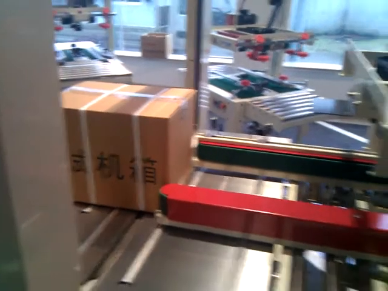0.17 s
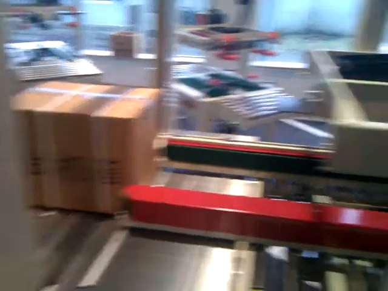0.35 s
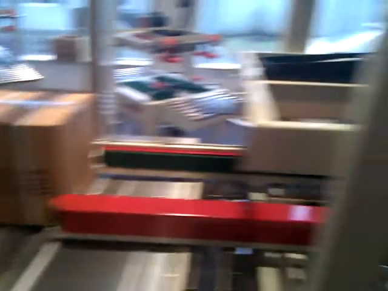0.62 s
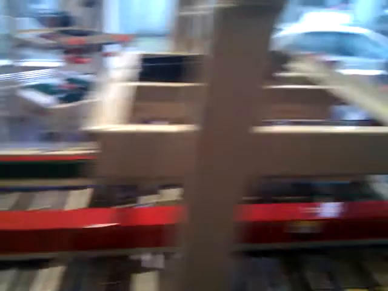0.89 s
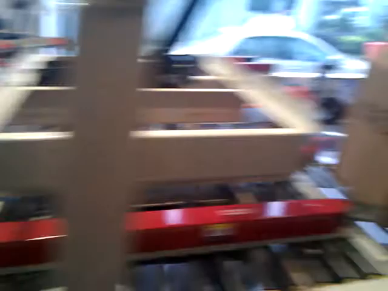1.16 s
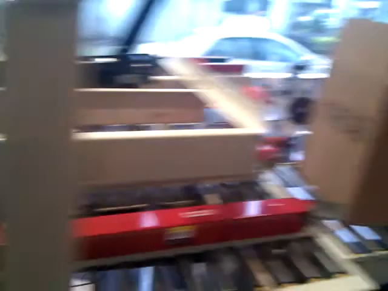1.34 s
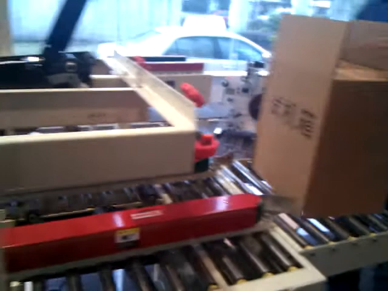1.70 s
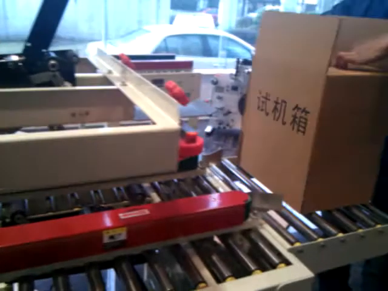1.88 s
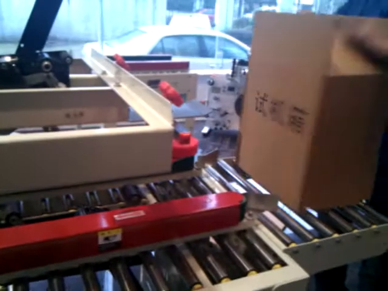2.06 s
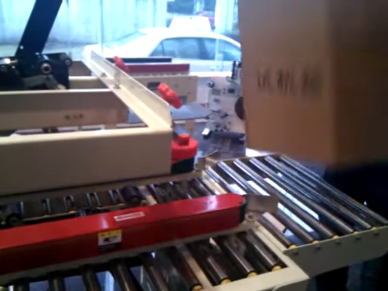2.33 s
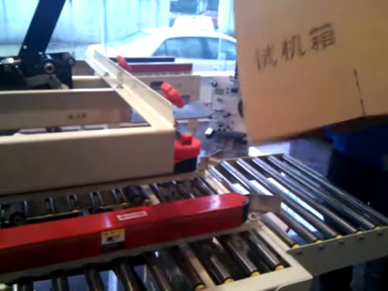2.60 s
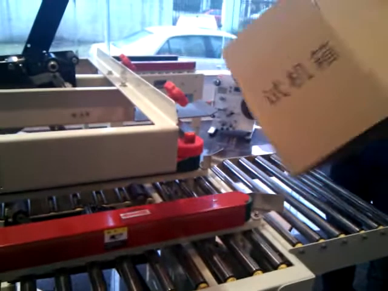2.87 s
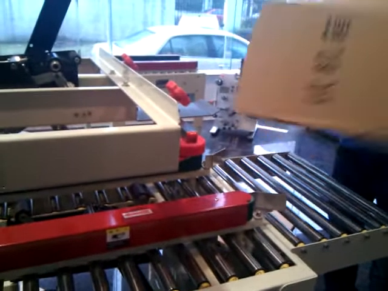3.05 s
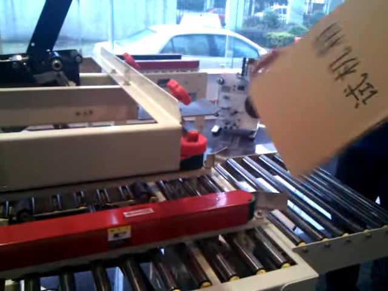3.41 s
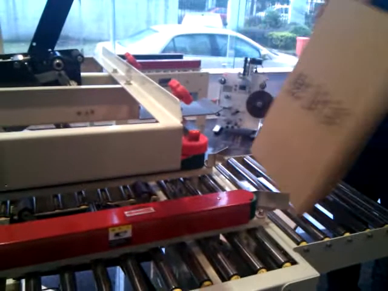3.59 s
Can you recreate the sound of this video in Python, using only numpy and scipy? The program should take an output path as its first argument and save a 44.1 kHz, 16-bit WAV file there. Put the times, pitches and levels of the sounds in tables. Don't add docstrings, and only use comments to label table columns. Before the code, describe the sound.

Conveyor machinery drones with a gear rattle as a cardboard carton is knocked and dragged over rollers

```python
import sys
import numpy as np
from scipy import signal
from scipy.fft import rfft, irfft, next_fast_len
from scipy.io import wavfile
from scipy.ndimage import uniform_filter1d, map_coordinates

SR = 44100
rng = np.random.default_rng(int(sys.argv[2]) if len(sys.argv) > 2 else 0)


def dump_mix(stems):
    frames = np.atleast_2d(stems).T
    limited = np.clip(frames, -1, 1)
    pcm = np.round(limited * 32767).astype(np.int16)
    wavfile.write(sys.argv[1], SR, pcm)


def gain_from_db(level_db):
    decades = np.asarray(level_db, float) / 20
    return 10 ** decades


N = 164493


def unit(x):
    return x / np.sqrt(np.mean(x ** 2) + 1e-20)


def along(points, hz):
    f, v = np.transpose(points)
    return np.interp(np.log(hz + 1), np.log(f + 1), v)


def curve(rows):
    return np.interp(np.arange(N) / SR, *np.transpose(rows))


def wobble(rate):
    knots = rng.standard_normal(int(N / SR * 60) + 4)
    return map_coordinates(knots, [np.arange(N) * min(rate, 60) / SR])


def filtered(x, response):
    m = next_fast_len(N + SR // 2)
    hz = np.fft.rfftfreq(m, 1 / SR)
    return irfft(rfft(x, m) * response(hz), m)[..., :N]


def body(x, peaks):
    def response(f):
        total = 0
        for k, (center, width, db) in enumerate(peaks):
            resonance = 1j * f * width / (center ** 2 - f ** 2 + 1j * f * width)
            total = total + (-1) ** k * gain_from_db(db) * resonance
        return total
    return filtered(x, response)


def grit(per_s, spread_db):
    size = gain_from_db(spread_db * np.clip(rng.standard_normal(N), -2, 2))
    return (rng.random(N) < per_s / SR) * rng.choice([-1, 1], N) * size


def ring(hits, modes, rise_s):
    out, t = np.zeros(N + SR), np.arange(SR // 4) / SR
    for start, db, hz in hits:
        tone = 0
        for share, level, t60 in modes:
            decay = gain_from_db(level + rng.normal(0, 1) - 60 * t / t60)
            tone = tone + decay * np.sin(2 * np.pi * hz * share * t)
        out[round(start * SR):][:len(t)] += gain_from_db(db - 1) * tone * (1 - np.exp(-t / rise_s))
    return out[:N]


# start in seconds, length in seconds, level in dB.
SLIPS = [(0.015, 0.047, -20.5), (0.154, 0.03, -22.5), (0.23, 0.074, -33), (0.428, 0.0047, -21),
         (0.493, 0.019, -29.5), (0.934, 0.079, -31.5), (0.983, 0.0086, -22), (1.17, 0.012, -20.5),
         (1.257, 0.0063, -20.5), (1.29, 0.11, -31.5), (1.736, 0.012, -25.5), (1.821, 0.027, -24),
         (1.93, 0.0097, -21), (2.468, 0.0074, -25.5), (2.532, 0.0039, -23), (2.552, 0.017, -23),
         (2.592, 0.015, -25.5), (2.682, 0.11, -33), (2.989, .02, -28.5), (3.027, 0.028, -27.5),
         (3.255, 0.0092, -20), (3.27, 0.015, -22), (3.539, 0.008, -26), (3.594, 0.008, -22),
         (3.632, 0.0053, -19), (3.646, 0.0074, -25)]
# time in seconds, level in dB.
DRAG = [
    (1.94, -49),
    (1.955, -7.5),
    (2.0, -13.5),
    (2.15, -14.5),
    (2.2, -19),
    (2.27, -13.5),
    (2.29, -11.5),
    (2.31, -23.5),
    (2.36, -42),
]
# resonance in Hz, width in Hz, level in dB.
ROLLER = [(4440, 790, 15.5), (3300, 4000, -4.5), (7450, 1000, -31.5), (1730, 3500, 4.5), (510, 870, 2.5)]


def rollers():
    rise_s, t60_s = 0.006, 0.049
    t, force = np.arange(N) / SR, np.zeros(N)
    for start, length, db in SLIPS:
        u = t - start
        fade_db = 60 * np.clip(u - length, 0, None) / t60_s
        force = force + gain_from_db(db - fade_db) * np.clip(u / rise_s, 0, 1)
    grains = unit(grit(per_s=2800, spread_db=4))
    hiss = rng.standard_normal(N)
    drag = gain_from_db(curve(DRAG) + 0.9 * wobble(40)) * (hiss + 0.48 * grains)
    slips = force * (grains + 0.74 * hiss)
    return body(slips + drag, ROLLER) / np.std(body(grains, ROLLER))


# start in seconds, level in dB, pitch in Hz.
THUMPS = [(.14, -27, 199), (.495, -20, 292), (2.28, -13.5, 168), (2.595, -14.5, 378), (2.929, -20, 360),
          (3.27, -16, 315), (3.561, -16, 380), (3.653, -15, 310), (3.665, -16, 330), (3.688, -17, 370),
          (1.549, -3, 300), (1.561, -9, 268), (1.901, -7, 316), (1.932, -9, 530), (1.942, -8, 371),
          (1.948, -8, 710), (3.545, -7, 300), (3.594, -9, 215)]
# share of the pitch, level in dB, 60 dB decay in seconds.
CARTON = [(.5, -14, .07), (.8, -3, .08), (1, 0, .05), (1.4, -4, .04), (2, -10, .03), (3.5, -14, .025)]
# center in Hz, width in Hz, level in dB.
CARTON_BAND = [(380, 600, 0)]


def carton():
    return body(ring(THUMPS, CARTON, rise_s=0.0025), CARTON_BAND)


def cracks(hits):
    t, t60_s, snap_db = np.arange(N) / SR, 0.005, -15
    force = 0
    for start, db, _ in hits:
        force = force + gain_from_db(db + snap_db - 60 * np.clip(t - start, 0, 1) / t60_s) * (t > start)
    return force * unit(body(rng.standard_normal(N), [(4000, 3500, 0)]))


# start in seconds, level in dB, pitch in Hz.
CLACKS = [(.022, -10, 4370), (.038, -9, 4100), (.06, -9, 4100), (.16, -9, 4030), (.165, -9, 3000),
          (.437, -9, 3900), (.717, -10, 2050), (.724, -10, 2000), (.739, -8, 2000), (.772, -8, 2050),
          (.776, -4, 2150), (1.176, -4, 4400), (1.1788, -5, 2100), (1.18, -4, 3600), (1.182, -6, 2900),
          (1.1845, -4, 3300), (1.2175, -2, 4400), (1.265, -6, 2720), (1.928, -12, 4900), (1.9315, -6, 1830),
          (1.9335, -3, 3900), (1.9345, -6, 1400), (1.952, 0, 4200), (1.955, -1, 4250), (1.965, -2, 4400),
          (1.98, -2, 4600), (2.277, -3, 4500), (2.2835, 0, 4150), (2.287, -3, 2000), (2.292, -1, 4400),
          (2.473, -9, 3900), (2.536, -8, 5000), (2.538, -6, 4300), (2.544, -6, 4300), (2.583, -5, 4570),
          (2.585, -1, 4450), (2.5905, -2, 4650), (2.594, -1, 4670), (2.5965, -1, 4300), (2.6, -2, 4300),
          (2.606, -4, 4400), (3.26, -9, 3800), (3.2755, -4, 4100), (3.281, -9, 4700), (3.627, -9, 3710),
          (3.646, -1, 4000), (3.65, -9, 4500)]
# share of the pitch, level in dB, 60 dB decay in seconds.
AXLE = [(1, 3, .009), (.87, -6, .009), (.45, -14, .01), (1.3, -12, .005)]
# center in Hz, width in Hz, level in
# dB.
STEEL_BAND = [(3300, 6000, 1)]


def axles():
    return body(ring(CLACKS, AXLE, rise_s=0.0005) + cracks(CLACKS), STEEL_BAND)


GEAR_HZ = 135.9
# time in seconds, level in dB.
LOAD = [(0, 0.5), (.25, -8), (.42, 3), (.55, 2.5), (.75, 6), (.85, 8), (1.15, 1), (1.3, 5.5), (1.7, 2.5),
        (1.9, 6), (2.2, 3), (2.5, -4.5), (2.85, 3.5), (3.07, 5), (3.2, 1), (3.45, 5), (3.6, -4),
        (3.73, -1.5)]
# resonance in Hz, width in Hz, level in dB.
HOUSING = [(1084, 240, -2), (2020, 740, -1.5)]


def gears():
    jitter_s, scatter_db = 0.000095, 3
    teeth = np.arange(1000) / GEAR_HZ
    chance = rng.standard_normal((len(teeth), 2))
    at = np.round((teeth + jitter_s * chance[:, 0]) * SR).astype(int)
    keep = (at >= 0) & (at < N)
    blows = np.bincount(at[keep], gain_from_db(scatter_db * chance[keep, 1]), N)
    rung = unit(body(body(blows, HOUSING), HOUSING))
    return gain_from_db(-35.5) * rung * gain_from_db(curve(LOAD) + 1.5 * wobble(5))


# multiple of the tooth rate, level in dB.
TOOTH_TONES = [(4, -47), (7, -44), (8, -42), (9, -47), (16, -45), (18, -45)]
# pitch in Hz,
# level in dB, width in Hz.
WHINES = [(97, -40, 16), (200, -42, 12), (376, -40, 6), (1890, -34, 50), (1987, -33, 16), (2040, -33, 22),
          (2090, -35, 18), (2345, -42, 10), (2395, -40, 20), (2444, -36, 14), (2537, -36, 14),
          (3188, -35, 20), (3341, -40, 22), (4190, -38, 40)]


def whines():
    t, shaft_hz = np.arange(N) / SR, 48.6
    hum = gain_from_db(-36 + wobble(1.4)) * np.sin(2 * np.pi * shaft_hz * t)
    for k, db in TOOTH_TONES:
        hum = hum + gain_from_db(db + 0.5 + 1.6 * wobble(2.2)) * np.sin(2 * np.pi * k * GEAR_HZ * t)
    tones = 0
    for hz, db, width in WHINES:
        tones = tones + gain_from_db(db) * unit(body(rng.standard_normal(N), [(hz, width, 0)]))
    return hum + gain_from_db(0.1 * curve(LOAD)) * tones


# frequency in Hz, level in dB per Hz.
RUSH = [(30, -15), (250, -4.5), (1000, -8.5), (2000, -5.5), (4500, -9), (6000, -27.5), (7400, -54),
        (9000, -45)]
# resonance in Hz, width in Hz, level in dB.
PANELS = [(1920, 516, 17), (4370, 400, -4.5)]


def conveyor():
    z = signal.stft(rng.standard_normal(N + 512), nperseg=512)[2]
    patches = uniform_filter1d(rng.standard_normal(z.shape), 6, 0)
    patches = uniform_filter1d(patches, 10, 1)
    air = signal.istft(z * gain_from_db(1.2 * unit(patches)), nperseg=512)[1][:N]
    rush = unit(filtered(air, lambda hz: gain_from_db(along(RUSH, hz))))
    rattle = unit(body(body(grit(per_s=970, spread_db=-2.5), PANELS), PANELS))
    rush = gain_from_db(-22 + 0.16 * wobble(13)) * rush
    return rush + gain_from_db(-28.5 + curve(LOAD) + 0.75 * wobble(21)) * rattle


# frequency in Hz, 60 dB decay in seconds.
HALL = [(200, 0.71), (2000, 1), (8000, 0.56)]


def hall(x):
    hz, t, z = signal.stft(rng.standard_normal(SR // 2), SR, nperseg=256)
    decay = gain_from_db(-60 * t / along(HALL, hz)[:, None])
    tail = signal.istft(z * decay, SR, nperseg=256)[1]
    late = np.pad(x, (500, 0))
    return signal.fftconvolve(late, tail / np.linalg.norm(tail))[:N]


def scene():
    scrape, box, steel, motor = rollers(), carton(), axles(), gears()
    wet = hall(0.5 * motor + gain_from_db(-4) * scrape + gain_from_db(-15) * steel + gain_from_db(-16) * box)
    return (motor + whines() + conveyor() + scrape + steel + box + wet)[None]


# start in seconds, top in Hz.
BANDWIDTH = [(0, 9000), (.085, 7550), (.27, 7050), (.535, 6550), (.72, 6000), (.755, 6550), (.945, 7520),
             (1.04, 6550), (1.135, 7520), (1.23, 6550), (1.27, 7520), (1.415, 6550), (1.715, 7050),
             (1.84, 7550), (1.905, 9000), (2.385, 7050), (2.55, 9000), (2.64, 6000), (2.68, 7520),
             (2.83, 7050), (2.9, 6550), (2.99, 7050), (3.15, 6550), (3.255, 7520), (3.335, 7050),
             (3.455, 6550), (3.51, 7050)]


def treble_gate(x):
    hz, t, z = signal.stft(x, SR, nperseg=2048, noverlap=1536)
    since, tops = np.transpose(BANDWIDTH)
    top = tops[np.searchsorted(since, t, 'right') - 1]
    leak = gain_from_db(-22) * (hz[:, None] > 8300) * (top > 7500)
    gate = np.where(hz[:, None] < top, 1, leak)
    return signal.istft(z * gate, SR, nperseg=2048, noverlap=1536)[1][:, :N]


# start in seconds, depth in dB.
DUCKS = [(0, -5), (0.172, -1.5), (0.775, 7), (1.184, 7), (1.559, 1), (1.944, 7), (1.959, 9.5), (2.103, 8.5),
         (2.2, 7.5), (2.298, 8.5), (2.594, 7.5), (3.284, 5), (3.553, 3.5), (3.653, 3)]


def gain_control(x):
    drop_s, recover_db_per_s = 0.0089, 22.5
    start, depth = np.array(DUCKS)[:, :1], np.array(DUCKS)[:, 1:]
    u = np.arange(N) / SR - start
    depth_db = np.max((depth - recover_db_per_s * u) * np.clip(u / drop_s, 0, 1), axis=0)
    return x * gain_from_db(-np.clip(depth_db, 0, None))


def top_cut(x):
    return signal.sosfilt(signal.butter(12, 8970, fs=SR, output="sos"), x)


def record(dry):
    x = filtered(dry, lambda hz: 1 / (1 + (hz / 8100) ** 20))
    x = gain_control(x)
    x = x / (1 + np.abs(x / 0.7) ** 5) ** (1 / 5)
    mix = treble_gate(x) + 0.0027
    return top_cut(mix)


dry = scene()
out = record(dry)
dump_mix(out)
```